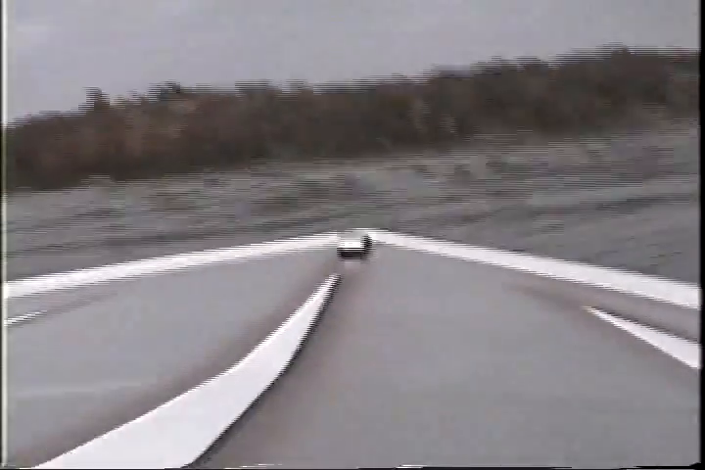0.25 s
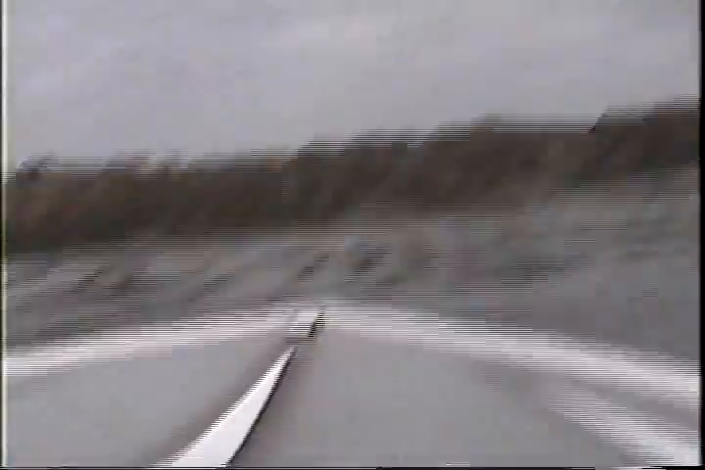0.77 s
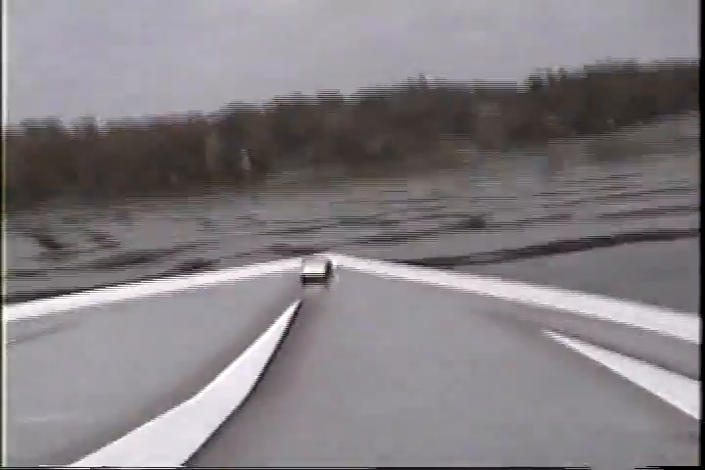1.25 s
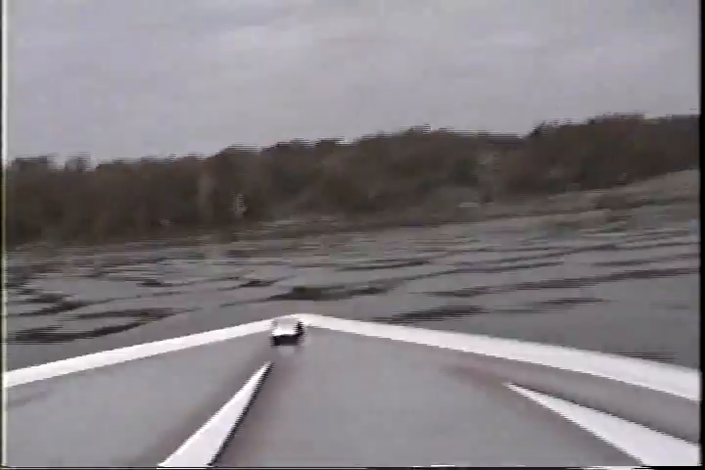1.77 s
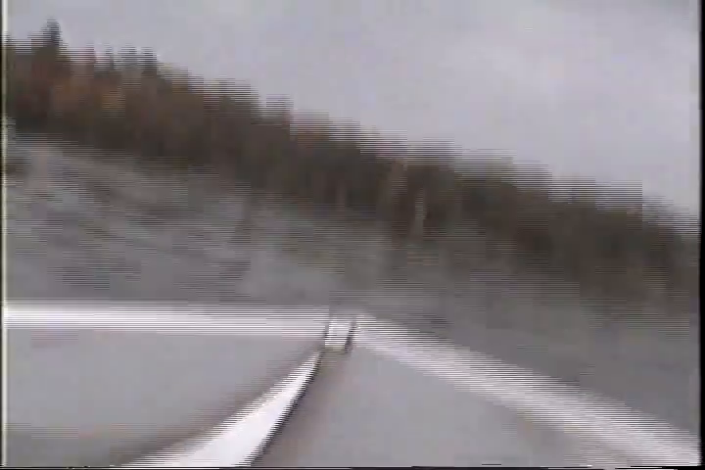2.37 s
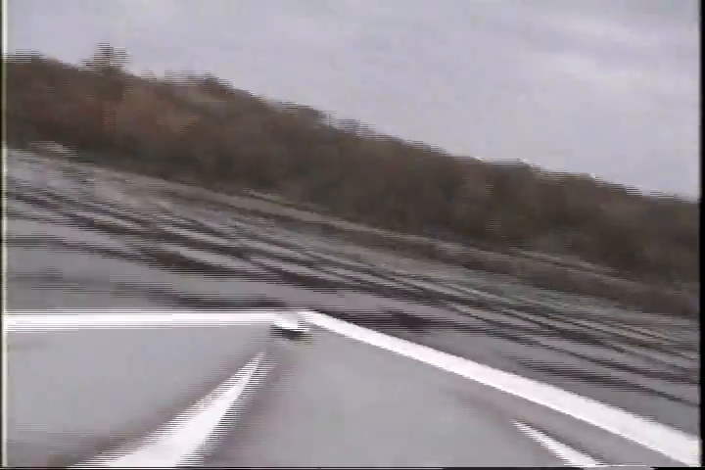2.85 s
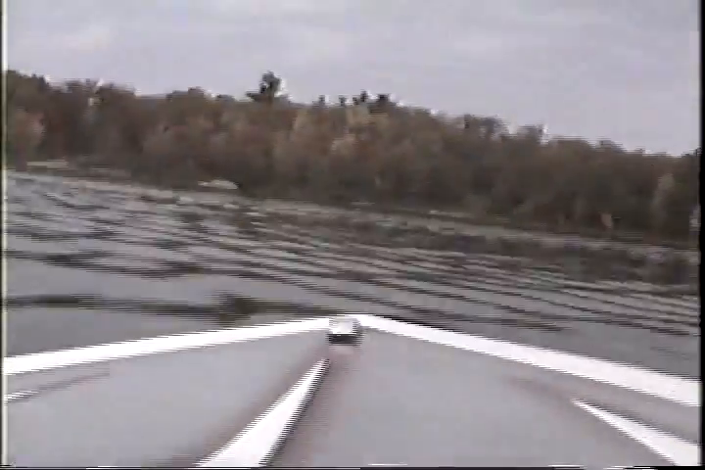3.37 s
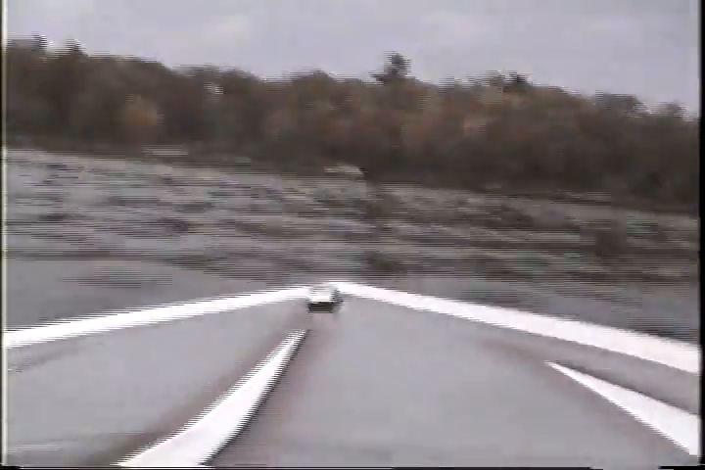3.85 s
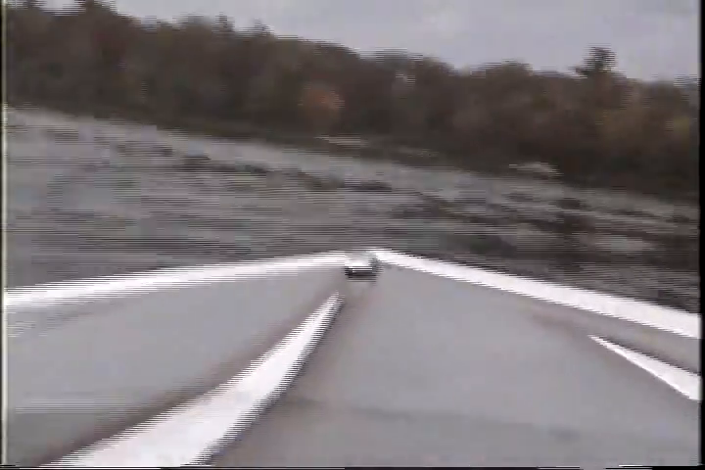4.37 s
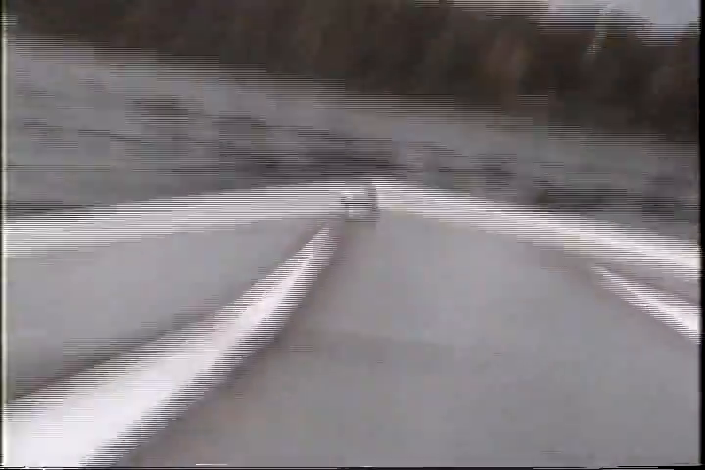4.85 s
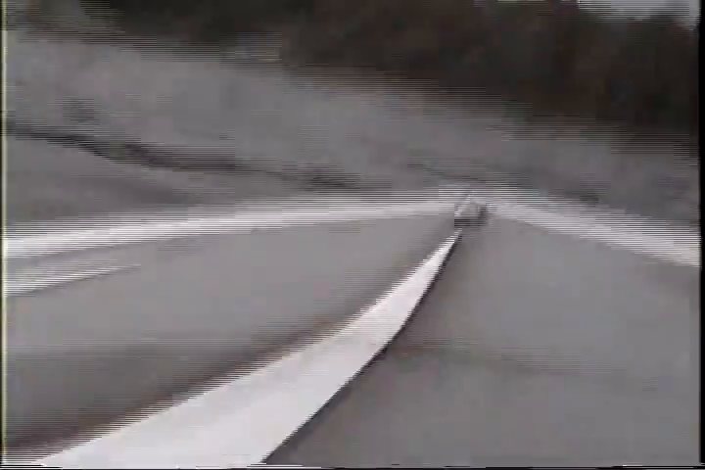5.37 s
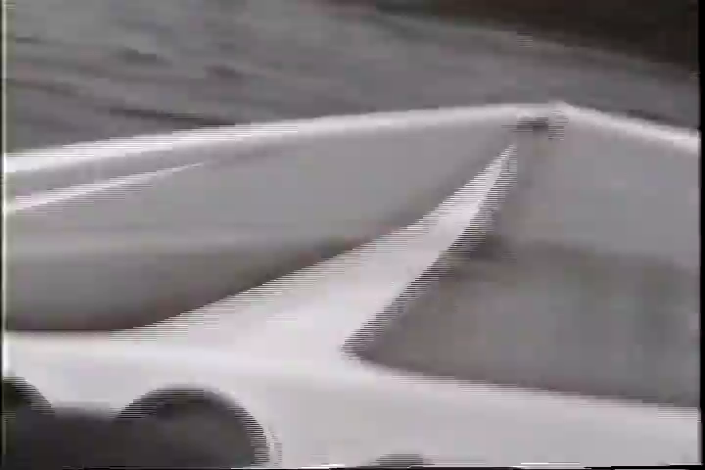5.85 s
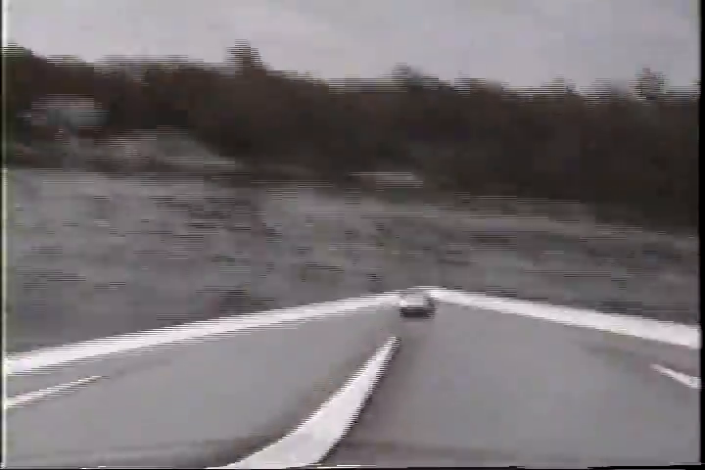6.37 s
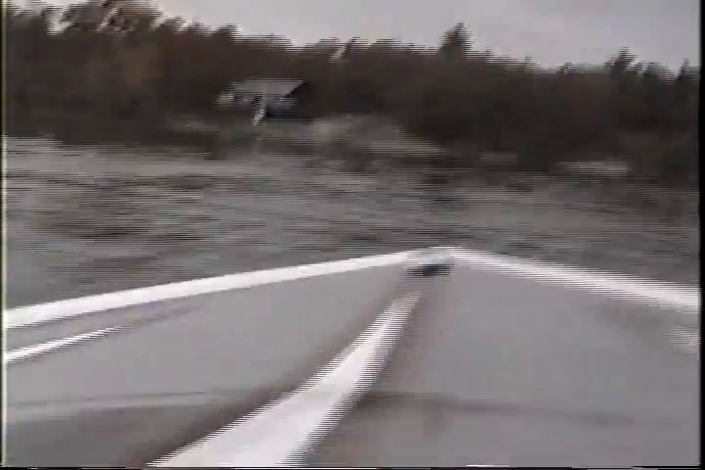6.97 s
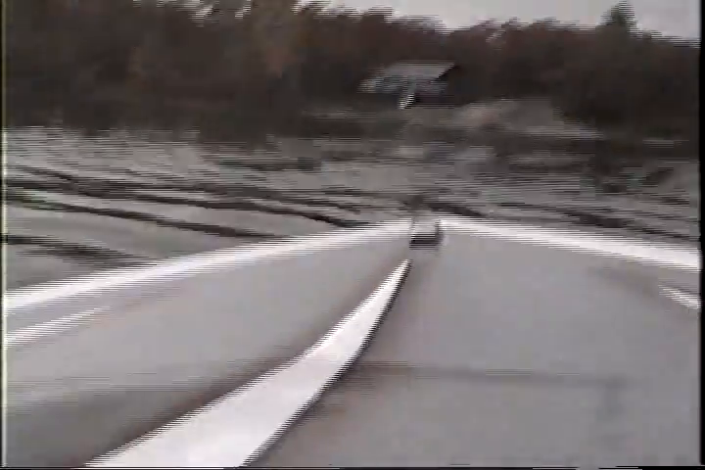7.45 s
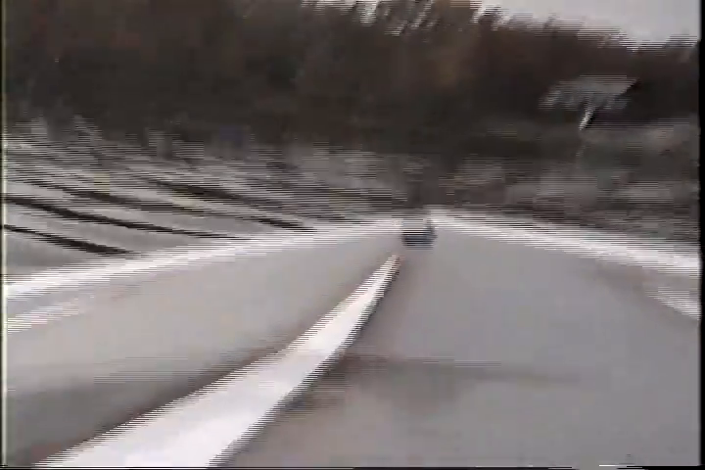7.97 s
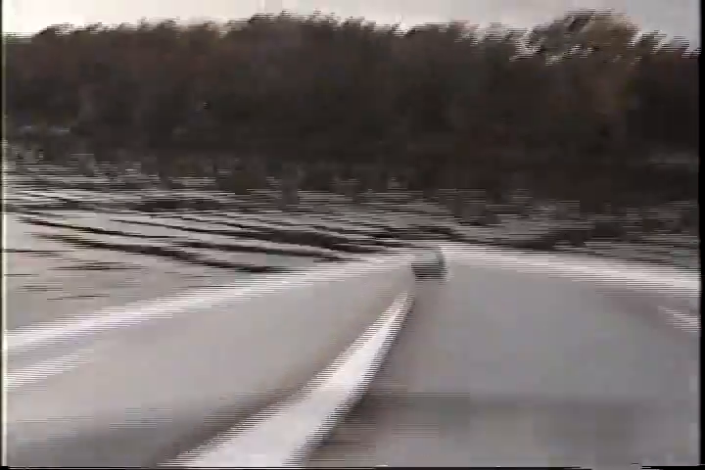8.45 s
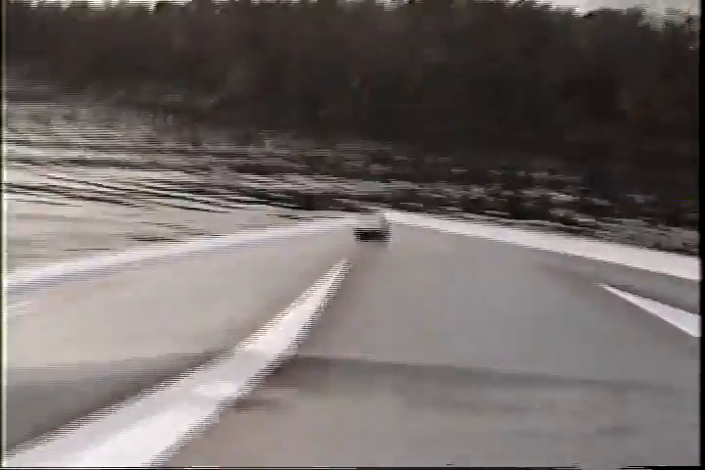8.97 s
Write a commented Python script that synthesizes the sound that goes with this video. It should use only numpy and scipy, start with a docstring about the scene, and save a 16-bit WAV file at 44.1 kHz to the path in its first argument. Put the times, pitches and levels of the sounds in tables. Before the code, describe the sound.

A V8 jet boat runs at speed across a lake, heard from a microphone in the cockpit. The engine holds a loud drone with a rasping, burbling edge. Its pitch dips after about a second, holds, then steps down again around five seconds. Spray hisses along the hull and gradually thins, wind buffets the microphone, a few drops tick nearby, and the bow slaps dully on waves, mostly just after the second dip.

```python
"""Jet boat from the cockpit

A V8 jet boat runs flat out across a lake; the throttle is eased twice. Eight uneven firings a cycle
give a loud drone with a rasping, burbling edge. Spray hisses along the hull, the bow slaps the waves,
wind buffets the microphone and a few drops tick close by. The one camcorder microphone rides in the
cockpit and feeds the right channel."""
import sys
import numpy as np
from scipy import signal
from scipy.fft import rfft, irfft
from scipy.io import wavfile
from scipy.ndimage import uniform_filter1d

SR = 44100
rng = np.random.default_rng(int(sys.argv[2]) if len(sys.argv) > 2 else 0)


def wrap_up_sound(samples):
    """Save the sound to the file named by the first command line argument, as 16-bit audio."""
    columns = np.atleast_2d(samples).T
    # keep every value between -1 and 1, then stretch to whole-number steps
    tamed = np.clip(columns, -1, 1)
    steps = np.round(tamed * 32767).astype(np.int16)
    wavfile.write(sys.argv[1], SR, steps)


N = 406161
T = np.arange(N) / SR


def undb(db):
    """Decibels to gain."""
    return 10 ** (np.asarray(db) / 20)


def unit(x):
    """Scale to rms 1."""
    return x / np.sqrt(np.mean(x ** 2))


def walk(rate_hz):
    """A smooth random wander of rms 1."""
    knots = rng.standard_normal(4096)
    path = np.interp(T * rate_hz, np.arange(len(knots)), knots)
    return unit(uniform_filter1d(path, int(SR / rate_hz / 2) + 1))


def bumps(table):
    """Bell-shaped swells in dB, one for each row of centre time, half-width and gain."""
    return sum(db * np.exp(-((T - s) / width) ** 2) for s, width, db in table)


def settle(start_db, end_db, time_s):
    """A level that relaxes from one value to another."""
    return end_db + (start_db - end_db) * np.exp(-T / time_s)


def colour(x, spectrum, size=8192):
    """Normalise a white source and shape it to a spectrum with a causal, minimum-phase filter."""
    hz, db = np.transpose(spectrum)
    bins = np.maximum(np.arange(size // 2 + 1) * SR / size, 1)
    gain = undb(np.interp(np.log(bins), np.log(hz), db))
    cepstrum = irfft(np.log(gain))
    cepstrum[1:size // 2] *= 2
    cepstrum[size // 2 + 1:] = 0
    response = irfft(np.exp(rfft(cepstrum)))
    return signal.fftconvolve(unit(x), response)[:N] * np.sqrt(SR / 2)


def clicks(at, sizes):
    """Impulses at fractional sample positions."""
    at = np.clip(at, 0, N - 2)
    i = at.astype(int)
    return np.bincount(i, sizes * (1 - at + i), N) + np.bincount(i + 1, sizes * (at - i), N)


# Faint ticks at the microphone. Each row: start in seconds, level in dB.
TICKS = [(2.601, -40), (2.667, -42), (3.101, -37.5), (5.603, -41), (5.77, -43), (5.987, -42), (6.821, -38),
         (7.939, -42)]

def ticks(decay_s=.0006, low_hz=8000):
    """Faint dry ticks, all treble and over at once."""
    envelope = sum(undb(db) * (T >= s) * np.exp(-np.maximum(T - s, 0) / decay_s) for s, db in TICKS)
    treble = signal.butter(2, low_hz, "highpass", fs=SR, output="sos")
    return signal.sosfilt(treble, envelope * rng.standard_normal(N))


# A small fitting near the microphone. Each row: mode in Hz, level in dB, seconds to fall 60 dB.
FITTING_MODES = [(2620, -5.5, .04), (3440, -9, 0.04), (4134, -6, 0.027), (6430, -3.5, 0.031),
                 (7600, -16, 0.029)]
# Drops striking it. Each row: start in seconds, relative level in dB, splash centre in Hz,
# seconds for the splash to fall 60 dB, gain of the ring in dB.
DROPS = [(.1815, -33, 2900, .025, 0), (.2663, -36, 4340, .04, 2), (.3247, -30, 3400, .025, 1),
         (.382, -28, 4330, .02, -1), (.553, -30, 4300, 0.029, 2), (.648, -30, 3500, .03, 1),
         (0.7266, -27, 3000, .02, -2), (1.015, -30, 4150, .02, 3), (1.544, -37.5, 3500, .03, 10),
         (1.711, -41, 3700, .03, 3), (1.826, -31, 4190, .03, -3), (5.244, -24, 5160, 0.023, -7),
         (5.261, -28, 5600, 0.023, -13), (5.7566, -27.5, 5400, 0.019, -13), (6.5012, -36, 3530, 0.096, -2),
         (6.5566, -41, 8010, 0.045, 10), (6.894, -37, 3474, 0.11, -2), (7.237, -27.5, 4110, 0.029, 6),
         (7.4643, -24.5, 6346, 0.019, 4.5), (7.8426, -32, 6306, 0.039, 7), (8.252, -27.5, 6410, 0.023, 9),
         (8.4515, -34.5, 3500, 0.089, -2), (8.9483, -37.5, 6114, 0.033, 2)]

def drops(trim_db=-2, band_ratio=1.37, rise_s=0.00087, top_hz=11000):
    """Each drop is a short splash and a quick ring of the fitting; a duller drop wakes lower modes."""
    out, t = np.zeros(N), T[:SR // 5]
    ring = sum(undb(db - 60 * t / t60) * np.sin(2 * np.pi * hz * t) for hz, db, t60 in FITTING_MODES)
    attack = 1 - np.exp(-t / rise_s)
    for s, db, hz, t60, ring_db in DROPS:
        edges_hz = [hz / band_ratio, min(hz * band_ratio, top_hz)]
        band = signal.butter(2, edges_hz, "bandpass", fs=SR, output="sos")
        splash = unit(signal.sosfilt(band, rng.standard_normal(len(t)))) * undb(-60 * t / t60)
        hit = undb(db + trim_db) * attack * (splash + undb(ring_db) * signal.sosfilt(band, ring))
        i = int(s * SR)
        out[i:i + len(t)] += hit[:N - i]
    return out


# Wind right on the microphone. Each row: frequency in Hz, level in dB.
WIND_SPECTRUM = [(12, -67), (30, -63), (55, -54.5), (110, -56), (200, -61.5), (500, -74.5), (2000, -112),
                 (8000, -150)]
# The stronger gusts. Each row: centre and half-width in seconds, gain in dB.
GUSTS = [(.33, 0.048, 10), (1.42, 0.14, 8), (2.55, 0.083, 4), (2.97, 0.065, 8), (3.85, .08, 2),
         (4.82, 0.04, 14), (5.3, 0.15, 5), (5.85, 0.1, 7.5), (6.04, 0.065, 11), (6.27, 0.11, 7),
         (6.47, 0.087, 4), (6.95, 0.2, 4), (7.95, 0.12, 5.5), (8.38, 0.058, 5)]

def wind(base_db=-0.8, buffet_db=2.5, lull_db=0.6):
    """Wind rumbles on the microphone: quick buffets, slower lulls and a few strong gusts."""
    db = base_db + buffet_db * walk(14) + lull_db * walk(3.1) + bumps(GUSTS)
    return colour(rng.standard_normal(N), WIND_SPECTRUM) * undb(db)


# The hull meeting a wave, heard from on board. Each row: frequency in Hz, level in dB.
HULL_SPECTRUM = [(25, -55), (100, -46), (400, -52.5), (1000, -55), (2000, -78), (5000, -97.5),
                 (14000, -125)]
# Slaps up ahead at the bow. Each row: start in seconds, strength in dB, decay in seconds.
SLAPS = [(1.36, -10, 0.034), (5.232, -3, 0.044), (5.86, -5, 0.088), (6.39, -18, 0.05), (6.495, 6, 0.03),
         (6.915, -1, .04)]

def bow_slaps(rise_s=0.005):
    """The bow comes down on a wave: a dull, brief whoosh."""
    force = np.zeros(N)
    for s, db, decay_s in SLAPS:
        t = np.maximum(T - s, 0)
        force += undb(db) * (1 - np.exp(-t / rise_s)) * np.exp(-t / decay_s)
    return force * colour(rng.standard_normal(N), HULL_SPECTRUM)


def droplets(low_hz, high_hz, ring_s, spread_db, count, samples):
    """A dense crackle of tiny bursts, each with its own pitch and strength."""
    when, pitch, force = rng.random((count, 3)).T[:, :, None]
    hz = low_hz + (high_hz - low_hz) * pitch
    db = spread_db * np.minimum(-np.log(1 - force), 3)  # many weak, a few strong
    t = T[:samples]
    rings = undb(db) * np.sin(2 * np.pi * hz * t) * np.exp(-t / ring_s)
    at = (when * (N - samples)).astype(int) + np.arange(samples)
    return unit(np.bincount(at.ravel(), rings.ravel(), N))


def spatter(mist_db, base_db=-60):
    """Heavier drops spatter on the hull, more strongly when the spray is thick."""
    patter = droplets(low_hz=3300, high_hz=8830, ring_s=0.0011, spread_db=4, count=1500, samples=500)
    return undb(base_db + mist_db) * patter


# The sheet of water alongside, and its fine mist. Each row: frequency in Hz, level in dB.
SHEET_SPECTRUM = [(300, -83.5), (1500, -74.5), (2500, -86.5), (3400, -83), (4300, -84), (5500, -88),
                  (8000, -99), (12000, -125)]
MIST_SPECTRUM = [(2000, -115), (5000, -93), (6500, -92), (8000, -94), (10000, -98), (12000, -109),
                 (16000, -122)]
# Waves throwing up extra spray. Each row: centre and half-width in seconds, gain of the mist in dB.
WAVES = [(.31, .08, 2), (.68, .14, 2), (4.83, 0.056, 3), (5.2, 0.069, 5), (5.95, 0.19, 5), (6.5, 0.15, 5),
         (8.45, 0.14, 2.5)]

def spray(cycles, flicker_db=1.22, throb_db=6.5, throb_phase=.24, throb_cycles=0.68, sheet_share=0.21):
    """Water sheets off the hull into mist: droplets and a flickering hiss that jumps once a cycle."""
    waves_db = bumps(WAVES)
    sheet_db = settle(4.8, -2.6, time_s=2.76) + sheet_share * waves_db  # thins as the boat sheds speed
    mist_db = settle(6.2, -4.5, time_s=3.7) + waves_db
    throb = np.exp(-((cycles - throb_phase) % 1) / throb_cycles)
    flutter = undb(flicker_db * walk(40) + throb_db * (throb - throb.mean()))
    crackle_gain = undb(settle(-1, -10, time_s=2)) * undb([[0], [-4]])  # the mist is the smoother one
    hiss = rng.standard_normal((2, N))
    crackle = droplets(low_hz=2000, high_hz=12000, ring_s=0.00032, spread_db=6, count=9000, samples=200)
    sheet, mist = flutter * (hiss + crackle_gain * crackle) / np.hypot(1, crackle_gain)
    sheet = colour(sheet, SHEET_SPECTRUM) * undb(sheet_db)
    mist = colour(mist, MIST_SPECTRUM) * undb(mist_db)
    return sheet + mist + spatter(mist_db)


# The firing rate in Hz at low, middle and high throttle.
THROTTLE_HZ = [239, 257, 279]

def at_throttle(hz, high_to_low):
    """Blend values given at high, middle and low throttle by the firing rate."""
    return np.interp(hz, THROTTLE_HZ, high_to_low[::-1])


# The cylinders in firing order, the two banks unevenly spaced. Each row: lateness in firing intervals,
# then relative strength in dB at high, middle and low throttle.
CYLINDERS = [(.14, -3, -14, -4), (-.18, -10, -2, 0), (.08, -3, -7, -14), (.07, -3, -8, -2), (0, -1, -6, -1),
             (.07, -2, -14, 0), (-.19, -10, -1, -14), (.07, -3, -4, -12)]
# The crack of each cylinder's pressure front. Each row: level in dB at high, middle and low throttle.
FRONTS_DB = [(-1, 1, -.5), (-9, -9, -5), (-7, -6, -8), (-5, -6, -6), (-7, 1, -.5), (0, -8, -3),
             (-9, -9, -4), (-8, -8, -1)]
# Three exhaust noises as they reach the cockpit. Each row: frequency in Hz, level in dB.
BURBLE_SPECTRUM = [(25, -79.5), (60, -61), (150, -61.5), (280, -54), (450, -64), (680, -59.5),
                   (1050, -76.5), (1400, -73.5), (2000, -93), (4000, -105), (12000, -135)]
GAS_SPECTRUM = [(60, -67), (250, -54), (500, -59), (1000, -62), (1500, -73.5), (2400, -84.5), (5000, -94.5),
                (10000, -112), (14000, -135)]
CRACK_SPECTRUM = [(700, -115), (1300, -94.5), (1650, -76), (2100, -79.5), (2500, -83), (2900, -87),
                  (4000, -97.5), (12000, -135)]

def exhaust_edge(hz, cycles, scatter_db=1.6, jitter_s=.00002, puff_s=0.0033, steady_gas=0.48,
                 unevenness=0.33):
    """No two firings are alike: their differences burble, gas rushes after each, steep fronts crack."""
    count = len(CYLINDERS)
    firing = np.arange(int(cycles[-1] * count))
    cylinder = firing % count
    late = np.array(CYLINDERS)[cylinder, 0]
    slip, force, burn = rng.standard_normal((len(firing), 3)).T
    at = np.interp((firing + late) / count, cycles, np.arange(N)) + jitter_s * SR * slip
    rates = np.interp(at / SR, T, hz)
    push_db = unevenness * np.array([at_throttle(r, CYLINDERS[c][1:]) for c, r in zip(cylinder, rates)])
    front_db = np.array([at_throttle(r, FRONTS_DB[c]) for c, r in zip(cylinder, rates)])
    pushes = clicks(at, undb(push_db + scatter_db * force))
    puffs = unit(signal.lfilter([1], [1, -np.exp(-1 / (puff_s * SR))], pushes))
    burble = colour(clicks(at, burn * undb(push_db)), BURBLE_SPECTRUM)
    gas = colour((puffs + steady_gas) * rng.standard_normal(N), GAS_SPECTRUM)
    crack = colour(clicks(at, undb(front_db + scatter_db * force)), CRACK_SPECTRUM)
    return burble + gas, crack


# The exhaust tone in the cockpit. Each row: multiple of the four-stroke cycle rate,
# then level in dB at high, middle and low throttle.
EXHAUST_ORDERS = [(2, -30, -32, -31), (3, -35, -38, -37), (4, -33, -34, -32), (5, -28, -25, -30),
                  (6, -31, -31, -30), (7, -35, -41, -36), (8, -20, -17, -18), (9, -36, -35, -32),
                  (10, -34, -39, -36), (11, -36, -38, -40), (12, -40, -41, -43), (13, -35, -39, -41),
                  (14, -41, -43, -38), (15, -54, -45, -43), (16, -46, -42, -43), (17, -40, -40, -38),
                  (18, -51, -42, -40), (19, -36, -41, -38), (20, -51, -51, -49), (21, -46, -34, -32),
                  (22, -50, -45, -38), (23, -47, -49, -55), (24, -49, -43, -37), (25, -48, -42, -36),
                  (26, -45, -49, -41), (27, -45, -57, -47), (28, -45, -44, -56), (29, -39, -42, -37),
                  (30, -41, -49, -57), (31, -56, -49, -50), (32, -45, -44, -40), (33, -46, -42, -46),
                  (34, -61, -46, -40), (35, -41, -44, -41), (36, -50, -47, -46), (37, -54, -52, -53),
                  (38, -52, -48, -45), (39, -53, -57, -54), (40, -51, -54, -51), (41, -56, -58, -51),
                  (42, -59, -53, -46), (43, -50, -52, -53), (44, -53, -57, -51), (45, -60, -55, -62),
                  (46, -61, -58, -48), (47, -56, -57, -57), (48, -53, -53, -57), (49, -58, -60, -57),
                  (50, -57, -50, -56)]
# Parts of that tone swell or fade as the boat banks. Each row: centre and half-width in seconds,
# centre and half-width in Hz, gain in dB.
BLOOMS = [(.1, .2, 277, 20, -2.5), (.7, .6, 1025, 35, 2.5), (1.35, .17, 203, 15, -9),
          (1.4, .2, 1170, 20, -9), (1.6, .35, 922, 20, 4), (1.77, .34, 260, 13, -1), (1.8, .35, 975, 18, 3),
          (1.9, .3, 850, 30, 4), (1.94, .4, 165, 18, -6), (2.06, .22, 665, 85, 7), (2.55, .2, 1030, 15, 5),
          (2.58, .22, 680, 30, -18), (2.6, .3, 1129, 20, -9), (2.65, .26, 934, 18, 8.5),
          (3.1, .35, 1061, 15, 3), (5.3, .15, 1130, 130, 2), (5.35, .2, 650, 25, 2), (5.6, .35, 880, 22, 3),
          (5.0, .3, 161, 14, 1.5), (9.2, .8, 810, 350, 1)]

def exhaust_tone(hz, cycles, waver_db=1.1, dispersion=0.00069, split_order=16):
    """Clean multiples of the cycle rate, lined up on the firings: a low drone and an upper bark."""
    count = len(CYLINDERS)
    late, *strength_db = np.transpose(CYLINDERS)
    place_in_cycle = (np.arange(count) + late) / count
    blooms = [(np.interp(s, T, hz) / count, centre_hz, width_hz, bumps([(s, width_s, db)]))
              for s, width_s, centre_hz, width_hz, db in BLOOMS]
    drone_and_bark = np.zeros((2, N))
    for order, *levels_db in EXHAUST_ORDERS:
        db = at_throttle(hz, levels_db)
        if order != count:  # the tone at the firing rate is spared this waver
            db += waver_db * walk(3.5)
        for cycle_hz, centre_hz, width_hz, swell_db in blooms:
            db += swell_db * np.exp(-((order * cycle_hz - centre_hz) / width_hz) ** 2)
        phasors = undb(strength_db) @ np.exp(-2j * np.pi * order * place_in_cycle)
        phase = at_throttle(hz, np.unwrap(np.angle(phasors)))
        phase -= dispersion * order ** 2  # the pipes smear each front: higher tones come out later
        drone_and_bark[int(order > split_order)] += undb(db) * np.sin(2 * np.pi * order * cycles + phase)
    return drone_and_bark


# Spells of harsher exhaust crack. Each row: centre and half-width in seconds, gain in dB.
RASP_SWELLS = [(2.1, 0.22, 2), (4.4, 0.66, .7), (8.7, 0.94, 3.5)]

def engine(hz, cycles, wander_hz=5):
    """The V8 from on board: drone, bark, roughness and rasp each follow the throttle and wander."""
    def level(db, db_per_hz, wander_db):
        return undb(db + db_per_hz * (hz - THROTTLE_HZ[1]) + wander_db * walk(wander_hz))

    rough, crack = exhaust_edge(hz, cycles)
    drone, bark = exhaust_tone(hz, cycles)
    rasp = crack * undb(bumps(RASP_SWELLS))
    return (drone * level(db=3.03, db_per_hz=-0.003, wander_db=0.35)
            + bark * level(db=3, db_per_hz=0.01, wander_db=0.34)
            + rough * level(db=-0.037, db_per_hz=0.037, wander_db=0.26)
            + rasp * level(db=0.47, db_per_hz=0.088, wander_db=0.55))


# Engine speed, eased in two steps and wavering with the load on the jet.
# Each row: time in seconds, firing rate in Hz.
ENGINE_SPEED = [(0.0, 277.5), (0.45, 280.3), (0.54, 277.9), (1.0, 277.8), (1.29, 271), (1.52, 264.4),
                (1.72, 260.9), (2.46, 258.4), (2.54, 258.1), (2.86, 257.7), (2.96, 258.4), (3.25, 255.6),
                (3.52, 257.3), (4.75, 256), (5.15, 257.8), (5.18, 257.3), (5.28, 248.7), (5.46, 240.8),
                (5.83, 239.3), (5.94, 240.0), (6.23, 240), (6.47, 239.9), (6.54, 239.3), (6.71, 240.3),
                (6.8, 239.8), (6.95, 239.6), (7.63, 238.4), (7.82, 238.7), (8.34, 237.7), (8.5, 238.5),
                (8.84, 238), (9.2, 237.4)]

def scene(crosstalk_db=-79.5):
    """Everything reaches the one cockpit microphone; it feeds the right channel and barely leaks left."""
    times, rates = np.transpose(ENGINE_SPEED)
    hz = np.interp(T, times, rates)
    cycles = np.cumsum(hz) / SR / len(CYLINDERS)  # four-stroke cycles completed
    microphone = ticks() + drops() + wind() + bow_slaps() + spray(cycles) + engine(hz, cycles)
    return np.outer([undb(crosstalk_db), 1], microphone)


def record(dry, gain_db=6.5, ceiling=0.77, left_hiss_db=-90, right_hiss_db=-60.5,
           whistle_db=-68, whistle_hz=15734, low_hz=8, top_hz=15850):
    """The camcorder rounds the tallest peaks, adds tape hiss and a faint line whistle, cuts the top."""
    loud = undb(gain_db) * dry
    tape = loud / (1 + (loud / ceiling) ** 4) ** .25
    tape = signal.sosfilt(signal.butter(1, low_hz, "highpass", fs=SR, output="sos"), tape)
    tape += undb([[left_hiss_db], [right_hiss_db]]) * rng.standard_normal((2, N))
    tape[1] += undb(whistle_db) * np.sqrt(2) * np.sin(2 * np.pi * whistle_hz * T)
    return signal.sosfilt(signal.ellip(12, .1, 80, top_hz, fs=SR, output="sos"), tape)


dry = scene()
out = record(dry)
wrap_up_sound(out)
```